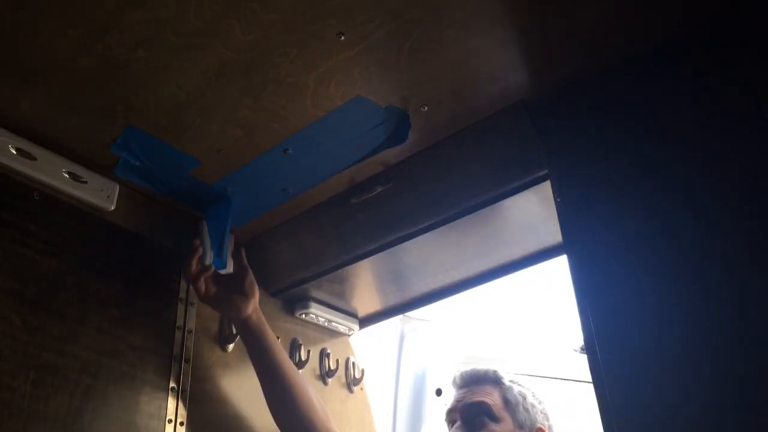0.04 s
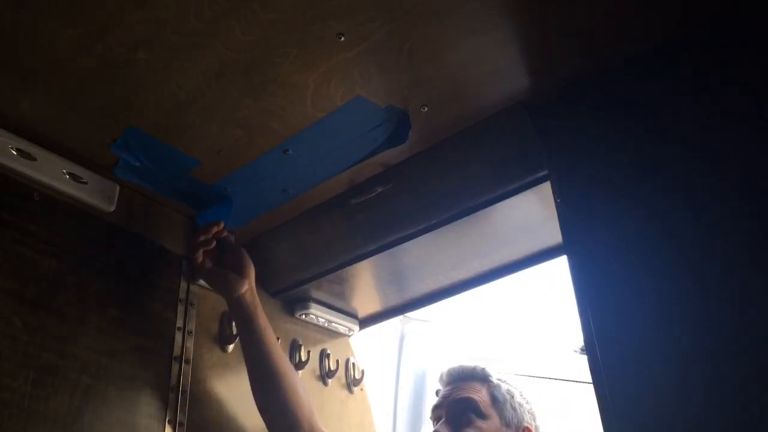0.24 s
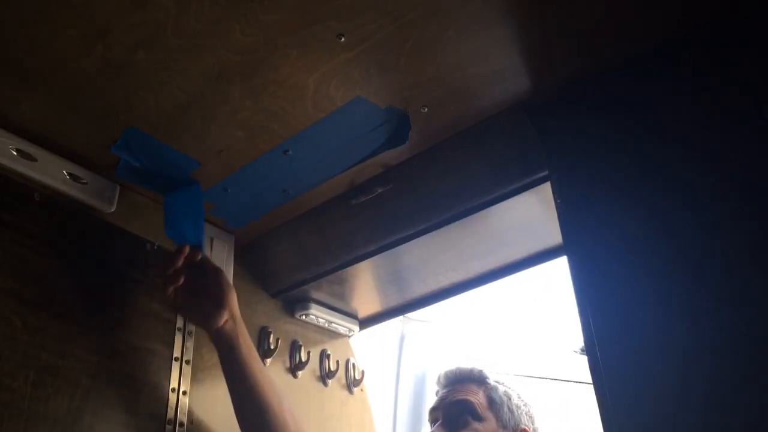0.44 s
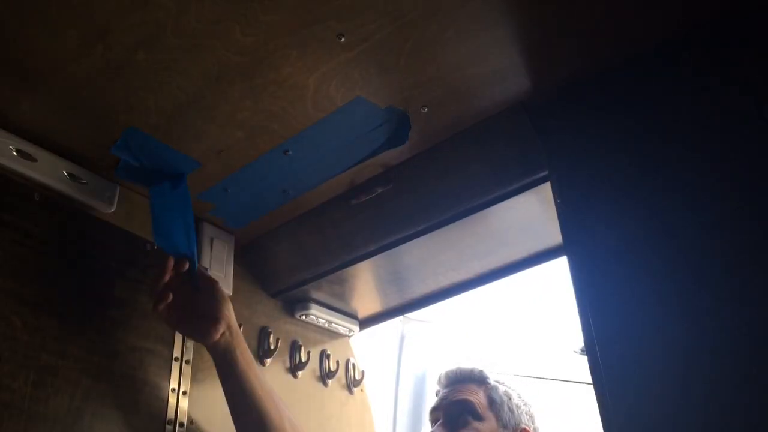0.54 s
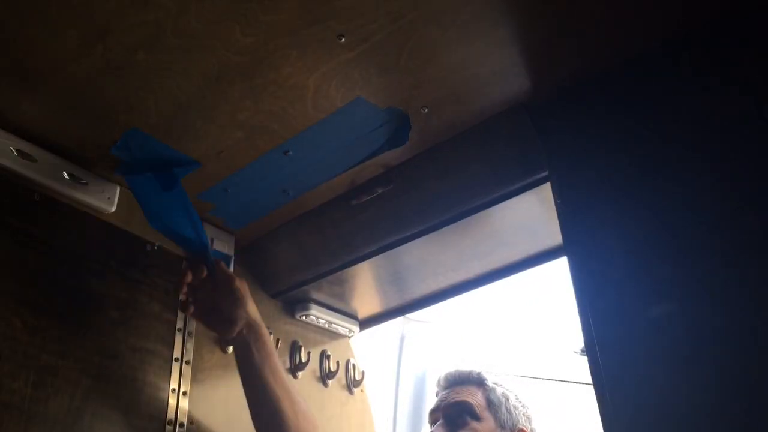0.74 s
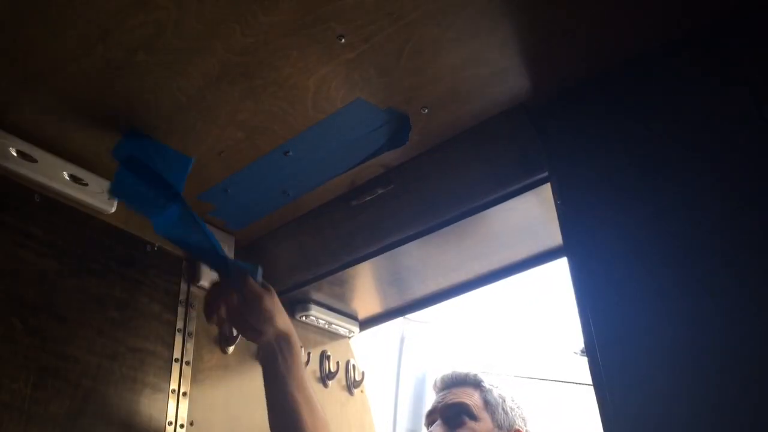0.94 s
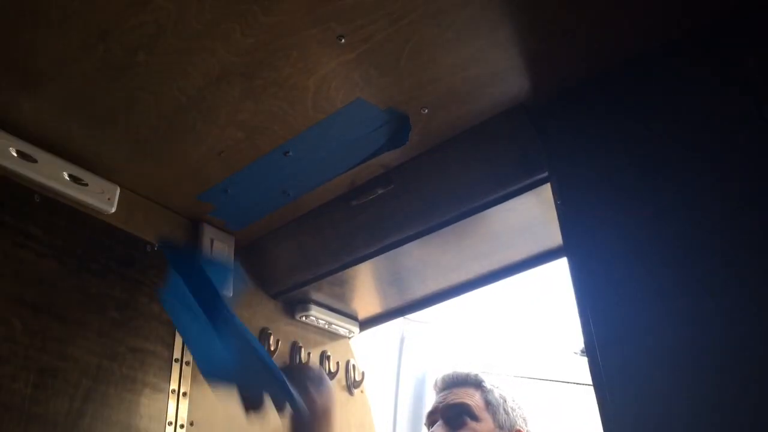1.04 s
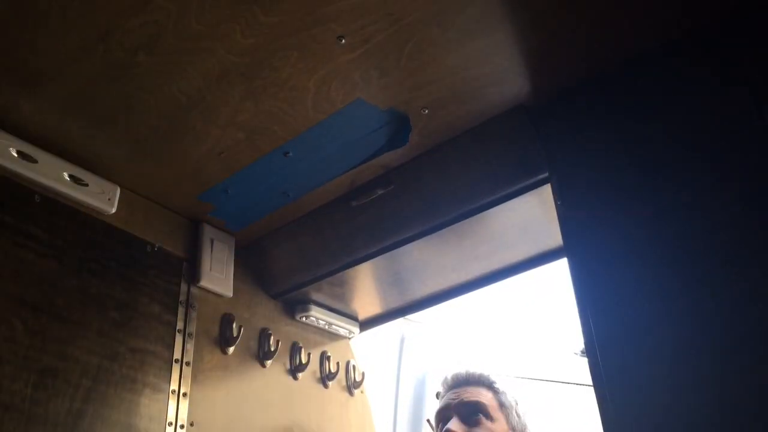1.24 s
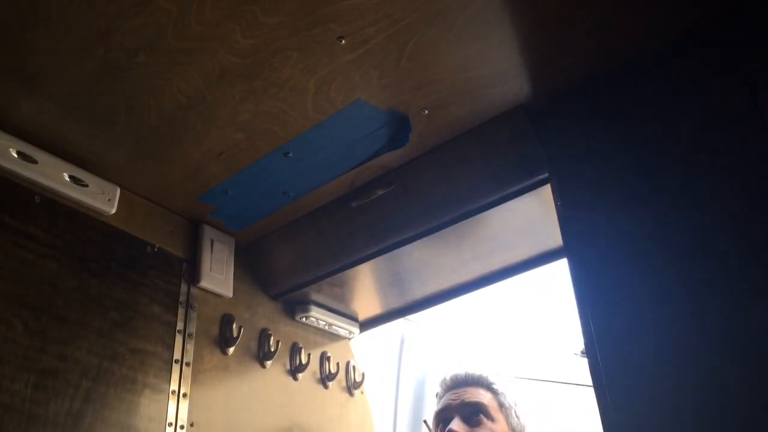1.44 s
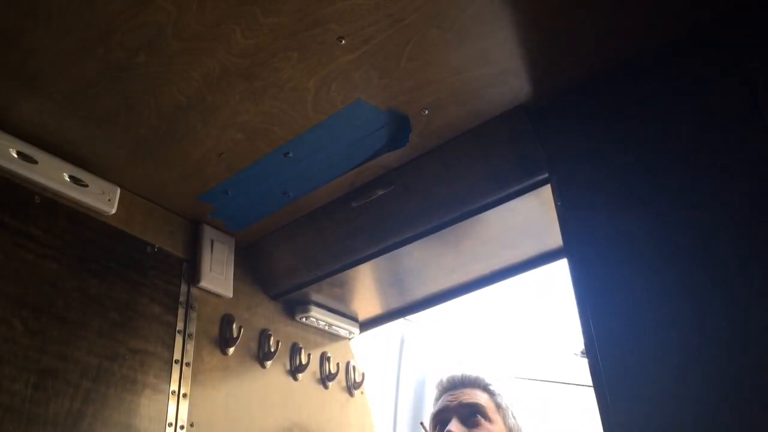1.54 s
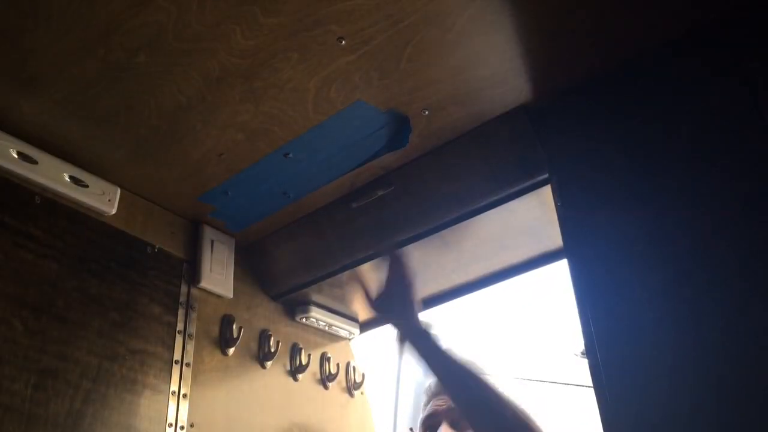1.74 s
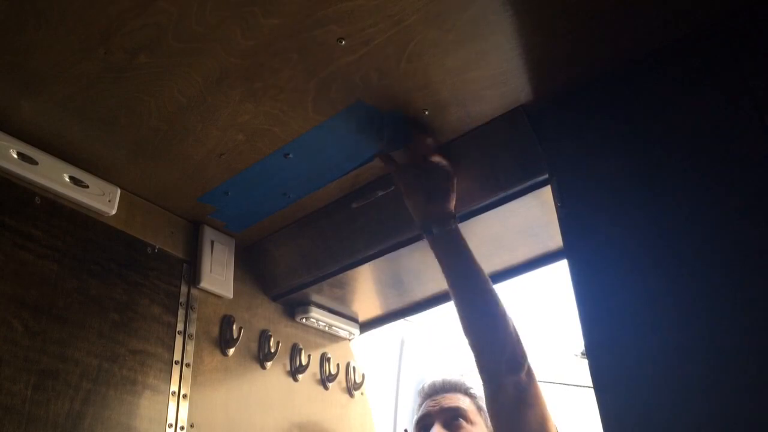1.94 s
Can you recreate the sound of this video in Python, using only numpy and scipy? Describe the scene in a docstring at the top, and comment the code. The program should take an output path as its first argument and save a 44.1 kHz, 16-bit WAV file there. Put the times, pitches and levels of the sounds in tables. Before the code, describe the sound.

Paper adhesive tape is peeled off a wooden panel inside a van. After near quiet, a sharp snap at 0.2 s leads into an uneven, crackling peel from 0.33 to about 0.8 s. A louder, brighter rip bursts out around 1.0 to 1.1 s. The freed tape rustles and crumples in the hand, busiest from 1.4 to 1.75 s, with a hard snap near 1.7, then fades to faint hum.

```python
"""A strip of paper tape is peeled off a wooden panel in two pulls, gripped and crumpled in a hand, inside a van.
The glue lets go in thousands of tiny slips, random clicks that hiss and drum on the panel's resonances.
Pitched grains rustle in clumps, creases snap as decaying noise bursts with a ring, and jerks knock the panel.
A small padded space adds a short tail of sparse reflections; low rumble comes and goes under the handling.
A faint hum and hiss of coloured noise lie under it all; mono microphone."""
import sys
import numpy as np
from scipy import signal
from scipy.io import wavfile
from scipy.ndimage import uniform_filter1d

SR = 44100
rng = np.random.default_rng(int(sys.argv[2]) if len(sys.argv) > 2 else 0)


def convert_level_to_amplitude(level_db):
    """Map a level in decibels to its linear amplitude factor."""
    exponent = np.asarray(level_db, float) / 20
    return 10 ** exponent


def persist_wave(psi):
    """Save psi, clipped to +-1, as 16-bit WAV."""
    counts = np.round(np.clip(psi, -1, 1) * 32767).astype(np.int16)
    wavfile.write(sys.argv[1], SR, np.atleast_2d(counts).T)


N = 88200  # length [samples]

# spectrum of the glue letting go: (frequency [Hz], relative level [dB])
GLUE_SPECTRUM = [(290, -18.5), (500, -9.5), (640, -5.5), (880, -13), (1080, -5), (1400, -1.5), (2570, -0.5),
                 (4300, -1), (5600, -6.5), (7000, -3), (10700, -5.5), (14900, -8), (16000, -6.5)]
# resonances of the wooden panel: (frequency [Hz], width [Hz], level [dB])
PANEL_MODES = [(136.4, 20, 0.5), (212, 49, 6.5), (311, 66, 0.5), (389.4, 41, 7), (598, 77, -15),
               (914, 40, -11.5)]


def evened(x):
    """Scales a signal to an rms of 1."""
    return x / np.sqrt(np.mean(x ** 2) + 1e-20)


def read(points, hz):
    """Reads a curve of (frequency, value) points along a logarithmic frequency axis."""
    f, value = np.transpose(points)
    return np.interp(np.log(hz + 1), np.log(f + 1), value)


def level(rows, column):
    """Gain along one dB column of a time curve, practically silent outside it."""
    rows = np.array(rows)
    db = np.interp(np.arange(N) / SR, rows[:, 0], rows[:, column], -120, -120)
    return convert_level_to_amplitude(db)


def colour(x, points):
    """Causal minimum-phase filter with the given spectrum."""
    db = np.maximum(read(points, abs(np.fft.fftfreq(4096, 1 / SR))), -80)
    log_gain = np.log(convert_level_to_amplitude(db))
    taps = np.fft.ifft(np.exp(np.conj(signal.hilbert(log_gain)))).real[:2048]
    return signal.oaconvolve(x, taps)[:len(x)]


def resonate(x, hz, width):
    """One resonance of gain 1: shifted down to 0 Hz, smoothed there and shifted back."""
    turn = np.exp(2j * np.pi * hz * np.arange(len(x)) / SR)
    r = np.exp(-np.pi * width / SR)
    return 2 * (turn * signal.lfilter([1 - r], [1, -r], x / turn)).real


def resonate_twice(x, hz, width):
    """Two equal resonances in a row, for steeper skirts."""
    return resonate(resonate(x, hz, width), hz, width)


def clicks(per_s, spread_db):
    """Random clicks of either sign; a few are large."""
    size, chance, sign = rng.random((3, N))
    loudness = convert_level_to_amplitude(spread_db * np.minimum(-np.log(1 - size), 5))
    return loudness * (chance < per_s / SR) * np.sign(sign - .5)


def tilt(x, treble_gain):
    """Scales the treble, what a gentle 4 kHz low-pass leaves out."""
    dull = signal.sosfiltfilt(signal.butter(1, 4000, fs=SR, output="sos"), x)
    return dull + treble_gain * (x - dull)


def panel(x):
    """The wooden panel rings briefly: its resonances side by side."""
    return sum(convert_level_to_amplitude(db) * resonate(x, hz, width) for hz, width, db in PANEL_MODES)


def peel():
    """Tiny glue slips hiss in uneven runs; coarser tugs drum on the panel, and low noise is its deep flex."""
    # the two pulls: (time [s], glue hiss [dB], panel drumming [dB], deep panel flex [dB], treble share [dB])
    pulls = [(0.325, -81, -61, -72, -3), (0.337, -28.5, -35.5, -74, 0.5), (0.355, -42, -50, -61, 1),
             (0.365, -39, -35, -66, -2.5), (0.391, -42, -45, -54, 3), (0.427, -40.5, -42, -51, 2),
             (0.451, -36.5, -41, -63, 1.5), (0.481, -35.5, -43.5, -68, -0.5),
             (0.567, -31.5, -34.5, -59, -3.5), (0.589, -35, -34, -47, 2.5), (0.621, -36, -43, -43, -4),
             (0.627, -43, -47, -41, 4), (0.651, -39.5, -37.5, -85, -1.5), (0.687, -42, -48.5, -50, -0.5),
             (0.735, -40, -42, -53, -2.5), (0.767, -41.5, -50, -61, -3), (0.783, -49, -52.5, -72, 0),
             (0.807, -46.5, -57, -47, 1), (0.859, -54, -57, -71, -1), (0.905, -44, -57, -68, 0),
             (0.967, -35, -38.5, -48, -3.5), (1.009, -27, -30, -29.5, -0.5), (1.053, -25, -32, -62, -7),
             (1.073, -26.5, -35, -33, -1.5), (1.093, -41.5, -55, -36, -2), (1.121, -47, -67, -40, -1),
             (1.135, -41, -72, -42.5, 4), (1.16, -61, -74, -64, 2)]
    slips_per_s, tugs_per_s, spread_db = 9000, 830, 2
    stick_db = 1.5  # rms unevenness of the runs
    flex_hz, flex_width_hz = 51, 58

    runs = convert_level_to_amplitude(stick_db * evened(uniform_filter1d(rng.standard_normal(N), size=120)))
    slips = clicks(slips_per_s, spread_db) * runs
    hiss = tilt(evened(colour(slips, GLUE_SPECTRUM)), level(pulls, column=4))
    drum = evened(panel(clicks(tugs_per_s, spread_db)))
    flex = evened(resonate_twice(rng.standard_normal(N), flex_hz, flex_width_hz))
    body = level(pulls, column=2) * drum + level(pulls, column=3) * flex
    return level(pulls, column=1) * hiss, body


def rustle():
    """Crinkles come in clumps; each size of crease has its own pitch; the treble share follows a curve."""
    # handling of the loose tape, one curve per stretch: (time [s], rustle [dB], treble share [dB])
    handling = [
        [(0.222, -25, 1), (0.262, -52, -5), (0.276, -50, -2), (0.288, -43.5, -1.5), (0.325, -59, -13)],
        [(1.15, -58, 5), (1.17, -49, 0), (1.194, -50.5, 15), (1.24, -29.5, -7), (1.272, -60, -1),
         (1.292, -60.5, 0), (1.324, -41.5, -7), (1.35, -70, -2), (1.362, -39.5, -21), (1.392, -59.5, -7),
         (1.399, -42, -11)],
        [(1.399, -48, -8), (1.407, -33.5, 0), (1.535, -34, -4.5), (1.547, -31, -1), (1.557, -36, 0),
         (1.639, -41, -9), (1.651, -29, -17.5), (1.673, -48, 5), (1.685, -25.5, -5), (1.775, -62.5, -6)],
        [(1.775, -48, -18), (1.845, -56.5, -7), (1.867, -51, 1), (1.875, -52.5, -5), (1.943, -51.5, -3.5),
         (1.969, -53.5, -9), (2.0, -48, -7)],
    ]
    # spectrum of the crinkling paper: (frequency [Hz], relative level [dB])
    paper_spectrum = [(180, -38), (300, -17.5), (842, -17), (978, -16), (1560, -2.5), (1900, -7.5),
                      (3240, -4), (10400, -8), (15200, -11), (16000, -14)]
    crinkles_per_s, spread_db, clump_db = 6100, 1.5, 2  # for each size of crease

    grains = 0
    for hz in np.geomspace(1200, 13000, num=7):  # creases of different sizes
        clumps = evened(uniform_filter1d(rng.standard_normal(N), size=200))
        train = clicks(crinkles_per_s, spread_db) * convert_level_to_amplitude(clump_db * clumps)
        grains = grains + resonate(train, hz, width=hz)
    grains = evened(colour(grains, paper_spectrum))
    return sum(level(rows, column=1) * tilt(grains, level(rows, column=2)) for rows in handling)


def snaps():
    """Each crease gives a sharp crack and a short crackling tail, noise bursts with a ring of their own."""
    # snapping creases: (time [s], nominal peak [dB], ring [Hz], broadband part [dB], crackling tail [dB])
    creases = [(0.124, -41, 1930, 8, -4), (0.2147, -34, 1640, -3, -21), (0.2207, -13, 3500, 13, -8),
               (0.2298, -28, 4180, -5, -10), (0.2866, -26, 3280, 2, 0), (0.3371, -22, 1900, -12, -9),
               (0.3646, -19, 2010, 7, -12), (0.5315, -35, 3610, -3, -12), (0.5606, -26, 2670, 14, -15),
               (0.5814, -26, 2490, 2, -7), (0.626, -20, 7250, -1.5, -14), (0.7799, -18, 2640, 12, -7),
               (0.9006, -35, 7300, -8, -7), (0.9883, -17, 2380, 4, -15), (0.9969, -19, 2210, -4, -10),
               (1.0041, -9, 7900, 4, -14.5), (1.0146, -12.5, 2310, 9, -10), (1.0314, -17, 1980, 0, -9),
               (1.0714, -22.5, 1110, -7.5, -11), (1.0953, -29.5, 2430, 6, -12),
               (1.1288, -28, 3520, -3, -11), (1.213, -28, 4160, -6, -2), (1.234, -22, 3070, -13, -27),
               (1.3053, -32.5, 4100, -11, -19), (1.3191, -27, 4430, 2, -7), (1.3584, -36.5, 2540, -7, -12),
               (1.4051, -35, 1850, 5, -17), (1.4454, -23, 7200, -7, -17), (1.4674, -27, 2640, 2, -10),
               (1.4944, -18.5, 4330, 12, -6), (1.518, -20.5, 4140, 4, -12), (1.5435, -15, 1576, -2, -20),
               (1.5612, -24, 2120, -5, -17), (1.5917, -25, 1810, 0, -8), (1.6247, -24, 4250, -6, -21),
               (1.6474, -20, 1580, -10, 1), (1.6514, -26, 1410, -9, 2), (1.6846, -11, 1800, 6.5, -13),
               (1.6869, -21, 1370, -22, -10), (1.7126, -20.5, 1960, -12, -21), (1.7405, -27, 1870, -9, -15),
               (1.8632, -49, 1990, 0, -10)]
    crack_t60_s, tail_t60_s, lag_s = .005, 0.066, .0008
    ragged_db = 3  # rms unevenness of the tail
    relative_width = 0.32  # of the ring, as a share of its pitch

    tape, t = np.zeros(N + SR), np.arange(4000) / SR
    band = signal.butter(2, [870, 10060], "band", fs=SR, output="sos")
    noises = rng.standard_normal((len(creases), 4000))
    for (s, db, hz, broad_db, tail_db), noise in zip(creases, noises):
        crackle_db = ragged_db * evened(uniform_filter1d(noise[::-1], size=60))
        crack_decay = convert_level_to_amplitude(-60 * t / crack_t60_s)
        tail_decay = convert_level_to_amplitude(tail_db + crackle_db - 60 * t / tail_t60_s)
        drive = noise * (crack_decay + tail_decay)
        width = relative_width * hz
        ring = resonate_twice(drive, hz, width) * np.sqrt(SR / (10 * width))  # offsets the narrow band's loss
        snap = signal.sosfilt(band, ring + convert_level_to_amplitude(broad_db) * colour(drive, GLUE_SPECTRUM))
        at = round((s + lag_s) * SR)
        # the peak is taken as 10 dB above the rms of the first 3 ms
        tape[at:at + 4000] += convert_level_to_amplitude(db) * snap / np.sqrt(10 * np.mean(snap[:130] ** 2))
    return tape[:N]


def knocks():
    """A short rough push rings the panel, mostly the resonances near its pitch."""
    # jerks of the tape: (time [s], nominal peak [dB], pitch of the panel patch that answers [Hz])
    jerks = [(0.21, -47, 210), (0.221, -36, 394), (0.336, -35, 620), (0.362, -37.5, 370),
             (1.096, -46.5, 420), (1.237, -45, 970), (1.359, -54, 820), (1.407, -41.5, 203),
             (1.412, -38, 650), (1.542, -51, 1065), (1.647, -43, 1040)]
    patch_octaves, push_t60_s = 0.6, 0.019

    out, t = np.zeros(N + SR), np.arange(4000) / SR
    for (s, db, hz), noise in zip(jerks, rng.standard_normal((len(jerks), 4000))):
        push = noise * convert_level_to_amplitude(-60 * t / push_t60_s)
        ring = 0
        for f, width, _ in PANEL_MODES:
            nearness = np.exp(-(np.log2(f / hz) / patch_octaves) ** 2)
            ring = ring + nearness * resonate(push, f, width)
        out[round(s * SR):][:4000] += convert_level_to_amplitude(db) * ring / np.sqrt(2 * np.mean(ring[:400] ** 2))
    return out[:N]


def rumble():
    """A soft low murmur of air and panel while the hand moves the loose tape: noise in a wide resonance."""
    # one curve per stretch of handling: (time [s], level [dB])
    murmur = [
        [(0.0, -72), (0.102, -68), (0.122, -67), (0.14, -80), (0.162, -63), (0.192, -79), (0.21, -72),
         (0.226, -51), (0.254, -72), (0.304, -57), (0.33, -63)],
        [(1.15, -56.5), (1.198, -64.5), (1.272, -64.5), (1.378, -65), (1.412, -50), (1.444, -62), (1.466, -51),
         (1.61, -65.5), (1.812, -60.5), (1.912, -86), (1.958, -63.5), (2.0, -74)],
    ]
    low = resonate_twice(rng.standard_normal(N), hz=154, width=203)
    return evened(low) * sum(level(rows, column=1) for rows in murmur)


def van(x):
    """Sparse reflections of random sign, each band dying at its own speed."""
    # decay of the padded space: (frequency [Hz], T60 [s])
    decay = [(300, .12), (2000, 0.073), (6000, 0.055), (14000, 0.066)]
    taps = np.zeros(SR // 2)
    at = np.arange(100, SR // 2 - 20, 20)  # one reflection in every 20 samples
    taps[at + rng.integers(0, 20, at.shape)] = rng.choice([-1., 1.], at.shape)
    hz, t, z = signal.stft(taps, SR, nperseg=128)
    fading = convert_level_to_amplitude(-60 * t / read(decay, hz)[:, None])
    tail = signal.istft(z * fading, SR, nperseg=128)[1]
    return signal.fftconvolve(x, tail / np.linalg.norm(tail))[:N]


def floor():
    """Steady hum and hiss, coloured noise that wavers a little."""
    # spectrum of the background: (frequency [Hz], relative level [dB])
    floor_spectrum = [(15, -32), (25, -12.5), (52, -8.5), (120, -31), (363, -46), (641, -28), (714, -34),
                      (1520, -34.5), (12900, -46.5), (16000, -52)]
    floor_db, waver_db = -63.5, 1.17
    waver = evened(uniform_filter1d(rng.standard_normal(N), size=2500))
    noise = evened(colour(rng.standard_normal(N), floor_spectrum))
    return convert_level_to_amplitude(floor_db + waver_db * waver) * noise


def scene():
    """All sources, the same in both channels; only the sounds of the tape and the knocks feed the van's tail."""
    hiss, body = peel()
    tape = hiss + rustle() + snaps() + knocks()
    tail = convert_level_to_amplitude(-10) * van(tape)
    return np.tile(tape + tail + body + rumble() + floor(), (2, 1))


def roll_off(x):
    """The treble ends steeply here."""
    return signal.sosfilt(signal.butter(12, 16530, fs=SR, output="sos"), x)


def record(dry):
    """The microphone rolls off the bass below 40 Hz; a steep filter ends the treble at 15.4 kHz."""
    mic = signal.sosfilt(signal.butter(2, 40, "high", fs=SR, output="sos"), dry)
    edge = signal.firwin(511, 15400, window=("kaiser", 5), fs=SR)
    mix = signal.oaconvolve(mic, edge[None], "same")
    return roll_off(mix)


dry = scene()
out = record(dry)
persist_wave(out)
```